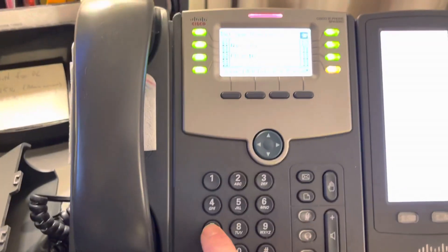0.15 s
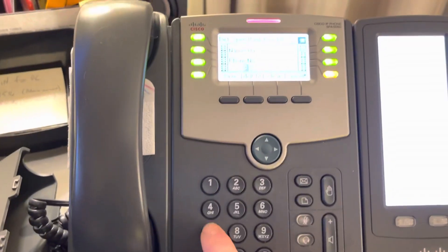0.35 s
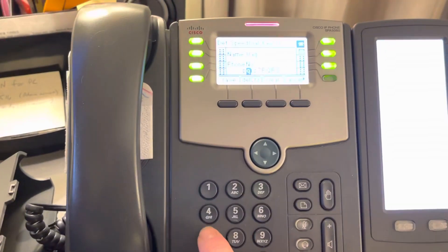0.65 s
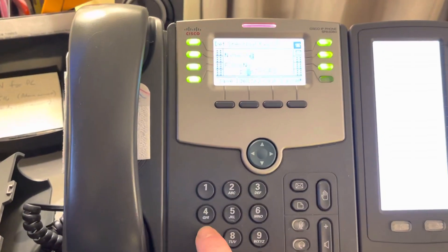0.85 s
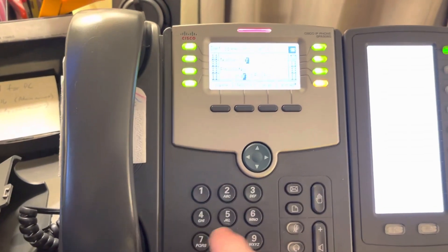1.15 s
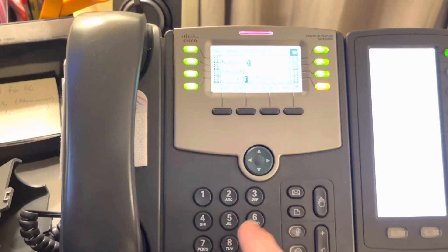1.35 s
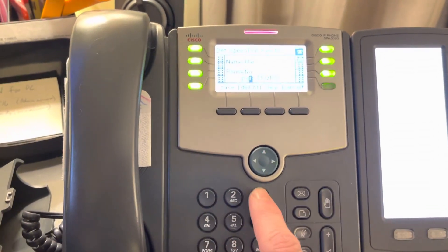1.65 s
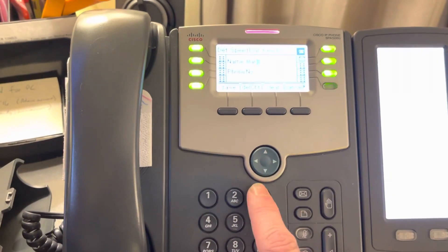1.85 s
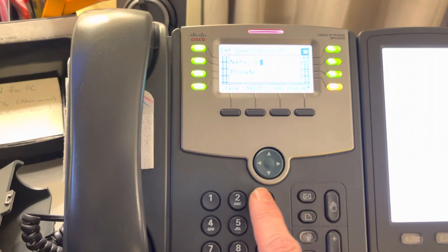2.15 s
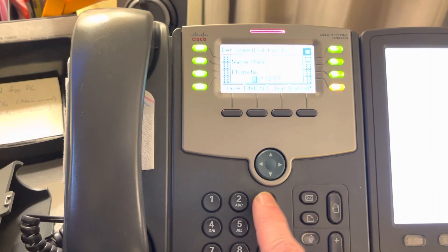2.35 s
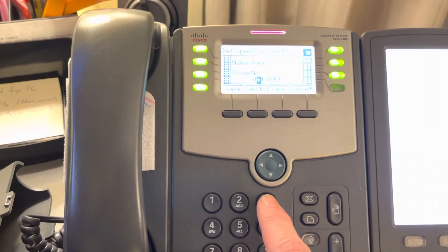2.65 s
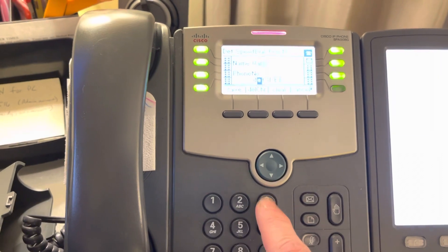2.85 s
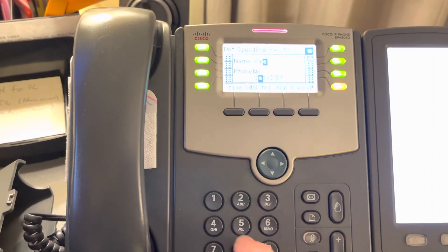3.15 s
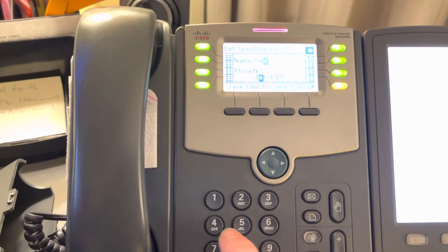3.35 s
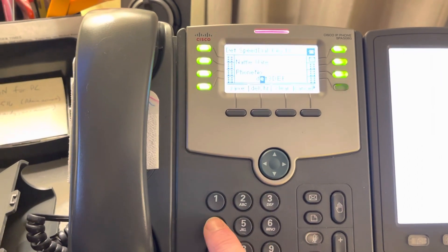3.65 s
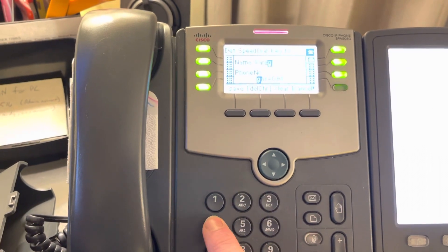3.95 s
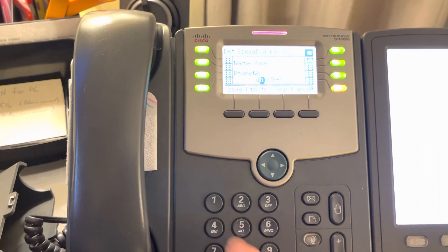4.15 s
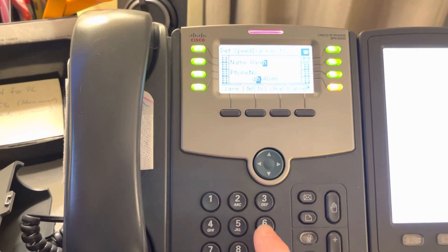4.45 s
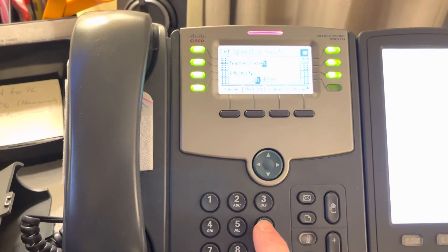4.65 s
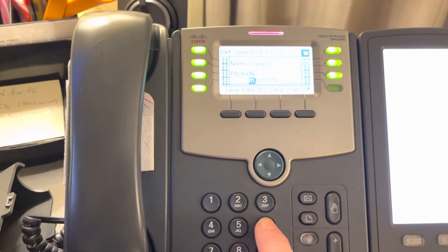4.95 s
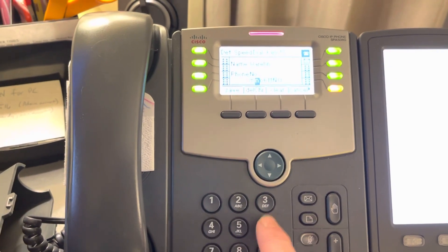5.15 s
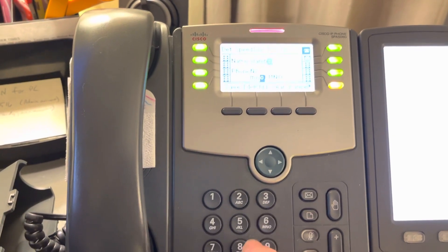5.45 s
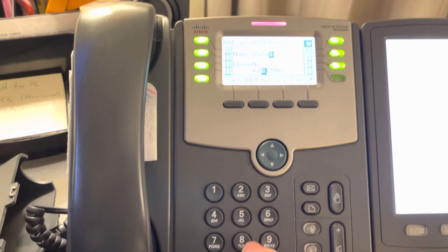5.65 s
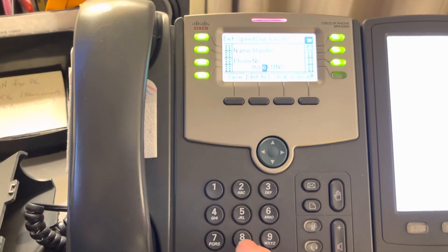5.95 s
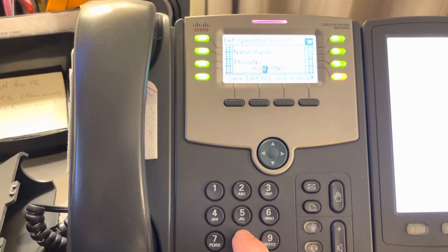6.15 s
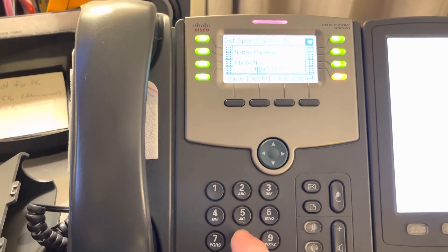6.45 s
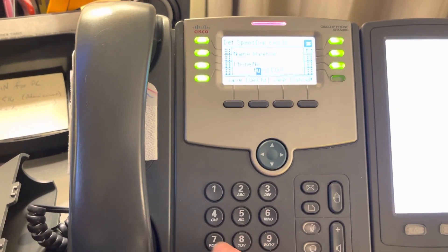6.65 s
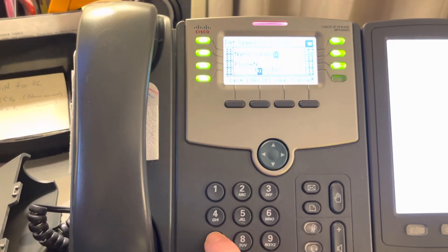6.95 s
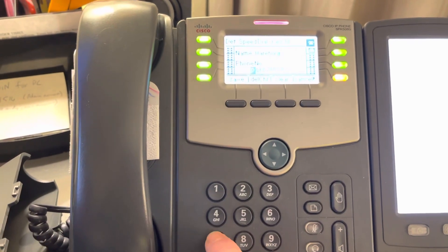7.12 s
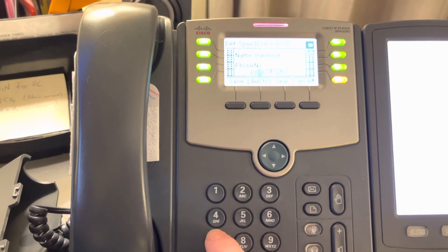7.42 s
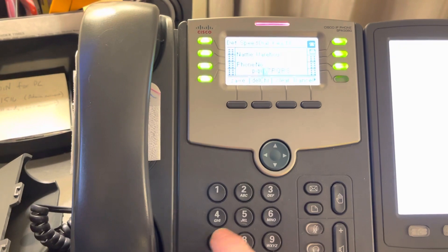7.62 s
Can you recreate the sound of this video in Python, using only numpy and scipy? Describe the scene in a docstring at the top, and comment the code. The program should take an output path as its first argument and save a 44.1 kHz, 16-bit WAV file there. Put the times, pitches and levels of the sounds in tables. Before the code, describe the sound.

Plastic keys on a desk phone click and clack in quick runs under a finger, over a faint low room hum.

```python
"""Desk phone keypad, close up

A finger types in quick runs on plastic keys, just in front of a stereo microphone in a small quiet room.
Each key bottoms out with a dull clack that can rock the housing, then springs back with a bright snap
and a bounce. Every key has its own voice, and a harder blow is brighter. Between runs the finger
brushes over the keys; ventilation and a mains hum fill the room."""
import sys
import numpy as np
from scipy import signal
from scipy.fft import rfft, irfft, next_fast_len
from scipy.io import wavfile
from scipy.ndimage import map_coordinates

SR = 44100
rng = np.random.default_rng(int(sys.argv[2]) if len(sys.argv) > 2 else 0)


def file_out(sig):
    """Save sig as 16-bit WAV at sys.argv[1]."""
    # one column per channel
    cols = np.atleast_2d(sig).T
    # limit, then scale
    lim = np.clip(cols, -1, 1)
    pcm = np.round(lim * 32767).astype(np.int16)
    wavfile.write(sys.argv[1], SR, pcm)


N = 343098
AGE = np.arange(SR // 8) / SR  # seconds since a blow

# Modes of the keypad plate. Each row: frequency in Hz, level in dB, t60 in seconds.
PLATE_MODES = [(1003, 2.5, 0.047), (1210, 2.5, 0.031), (1453, -5, 0.02), (1950, 2, 0.02),
               (2513, 6.5, 0.022), (3200, -26, 0.013), (4000, -16, 0.014), (4950, -9.5, 0.021),
               (5320, -13, 0.0096), (5920, -10, 0.017), (7500, -18.5, .009)]
# The crack of a cap on its guide. Each row: frequency in Hz, level in dB.
SNAP_SPECTRUM = [(200, -42), (700, -17.5), (1000, 3), (1900, 5), (2500, 2.5), (3050, 0.5), (3700, -3),
                 (4300, -2), (5300, -3.5), (7500, -8), (9500, -5.5), (11000, -7), (12400, -22)]
# Each key going down: 3 kHz colour, treble colour, housing knock, cap rattle, all in dB.
KEY_DOWN = {"3": (-11.5, -9, -3, -23), "4": (-3.5, -10, -13, -9), "6": (-5, -10, -8, -15),
            "7": (-4, 1.5, -26, -4), "8": (-1.5, 1.5, -23.5, -9.5)}
# Each key springing back: 1 kHz colour and treble colour, both in dB.
KEY_UP = {"3": (0, 0), "4": (-8.5, -1.5), "6": (0, 2.3), "7": (-10, -0.38), "8": (0.86, 5)}
# The two short rings of each key cap. Each row: frequency in Hz, level in dB against the crack.
CAP_MODES = {"3": [(2500, -5), (10500, -13)], "4": [(3500, -7.5), (4750, -10.5)], "6": [(5400, -11.5),
             (10500, -8.5)], "7": [(3720, -7.5), (5600, -14)], "8": [(2200, -7), (11000, -3.5)]}


def keypad():
    """All that the finger sets off; the fine chatter differs in each direction that it radiates."""
    return presses() + releases() + settles() + touches() + brushes()


def presses():
    """A key slides down and hits bottom: the plate clacks, the push rocks the housing, the cap rattles."""
    # Each row: time in seconds, level in dB, key.
    strikes = [(0.08, -44.5, "7"), (0.3318, -42.5, "7"), (0.618, -40.5, "7"), (1.9576, -39, "3"),
               (2.1925, -39, "3"), (3.6236, -42.5, "4"), (3.8163, -37, "4"), (4.638, -51, "6"),
               (4.895, -37.5, "6"), (5.1007, -36, "6"), (6.049, -48, "8"), (6.2407, -34, "8"),
               (6.83, -39, "7"), (7.0269, -37, "7"), (7.2153, -37.5, "7"), (7.3997, -36.5, "7")]
    ordinary_db, slide_s, rattle_s = -39.5, .014, .0028
    brightens, rattle_grows = 2.06, 0.9  # extra dB for each dB harder
    out = np.zeros(N)
    for s, db, key in strikes:
        mid_db, top_db, knock_db, rattle_db = KEY_DOWN[key]
        force_db = db - ordinary_db
        add(out, s - slide_s, amp(db - 25.5) * travel(slide_s))
        add(out, s + .0003, amp(db) * clack(mid_db, top_db + brightens * force_db))
        add(out, s + .001, amp(db + knock_db + 5.5) * knock())
        rattle = snap(db + rattle_db + rattle_grows * force_db, CAP_MODES[key], KEY_UP[key][0], top_db=2)
        add(out, s + rattle_s, rattle)
    return out


def releases():
    """The finger lifts: the key slides up, snaps on its stop and bounces once; the housing recoils."""
    # Each row: time in seconds, level in dB, bounce delay in seconds, bounce level in dB, key.
    lifts = [(0.2024, -36.5, .0028, -39.5, "7"), (0.4495, -35.5, .0076, -39.5, "7"),
             (0.7636, -39, 0.0084, -42, "7"), (2.0841, -36, .002, -48, "3"),
             (2.3263, -33.5, .0034, -39.5, "3"), (3.724, -39, 0.0037, -41.5, "4"),
             (3.9436, -29.5, 0.0037, -34.5, "4"), (4.8026, -30, 0.0031, -32, "6"),
             (4.9924, -39, 0.0057, -38, "6"), (5.2083, -30, 0.0057, -33.5, "6"),
             (6.1704, -36.5, .0074, -44, "8"), (6.3533, -30.5, 0.0079, -44, "8"),
             (6.9356, -34, 0.0048, -38, "7"), (7.1147, -34, .0056, -35.5, "7"),
             (7.304, -34, .0057, -36.5, "7"), (7.5115, -32, 0.0072, -35, "7")]
    slide_s, recoil_db = .005, -8.5
    out = np.zeros(N)
    for s, db, bounce_s, bounce_db, key in lifts:
        low_db, top_db = KEY_UP[key]
        knock_db = KEY_DOWN[key][2]
        strike = s + .0004
        add(out, s - slide_s, amp(db - 26) * travel(slide_s))
        add(out, strike, snap(db, CAP_MODES[key], low_db, top_db))
        add(out, strike, amp(db + knock_db + recoil_db) * knock())
        # Free of the finger, the bouncing cap has a colour of its own.
        add(out, strike + bounce_s, snap(bounce_db, CAP_MODES[key], low_db=-0.5, top_db=6.5))
    return out


def clack(mid_db, top_db):
    """A dull blow on the keypad plate, and its reflection from the desk."""
    # Each row: frequency in Hz, level in dB.
    spectrum = [(150, -33), (450, -2), (750, -7.5), (950, 2), (1300, -2.5), (1600, -4), (2500, -6),
                (4000, -11), (6000, -23), (9000, -24.5), (11000, -20.5), (12400, -36)]
    tilt = [(1400, 0.0033), (3200, mid_db), (7000, top_db)]
    hit = coloured(contact(push_db=-1.5, t60=0.0092, rise_s=0.00024), spectrum, tilt)
    hit = blow(blow(hit) + amp(-6.0) * ring(PLATE_MODES, scatter_db=1.5, detune=0.044))
    desk_echo = coloured(hit, [(1500, -0.5), (5000, -5.5)], [(300, -6.5), (900, 0)])
    delay_s = .0024 * rng.uniform(0.903, 1.42)
    add(hit, delay_s, amp(-7) * desk_echo)
    return hit


def snap(db, cap_modes, low_db, top_db):
    """A light key cap strikes its guide: a bright crack, the cap's short rings, a little of the plate."""
    ordinary_db, brightens = -35.5, 0.59  # an ordinary snap; dB of treble for each dB harder
    tilt = [(1400, low_db), (3200, 0), (7000, top_db + brightens * (db - ordinary_db))]
    crack = coloured(contact(push_db=-10.5, t60=0.012, rise_s=.0001), SNAP_SPECTRUM, tilt)
    cap = sum(amp(level) * blow(fade(AGE, 0.0062) * np.sin(2 * np.pi * hz * AGE))
              for hz, level in cap_modes)
    plate = ring(PLATE_MODES, scatter_db=-1.5, detune=0.058)
    return amp(db - 3.0) * (blow(crack) + cap + amp(low_db - 11.5) * plate)


def knock():
    """The heavy housing takes a moment to start swinging and is too small to radiate bass."""
    # The housing on the desk. Each row: frequency in Hz, level in dB, t60 in seconds.
    housing_modes = [(377, -2.5, 0.04), (466, -5.5, 0.033), (557, -8, 0.038), (638, -5, 0.036),
                     (1040, -18, 0.047), (1140, -15.5, 0.034)]
    swing = ring(housing_modes, scatter_db=-0.3, detune=0.0054) * (1 - np.exp(-AGE / 0.00062))
    return blow(coloured(swing, [(220, -24.0), (350, 8.0)], [(1000, 6.5), (4000, -11.0)]))


def contact(push_db, t60, rise_s):
    """One sharp push and the dense, quickly dying chatter of plastic parts."""
    chatter = rng.standard_normal(len(AGE)) * fade(AGE, t60) * (1 - np.exp(-AGE / rise_s))
    return amp(push_db) * blow(1.0 * (AGE == 0)) + blow(chatter)


def ring(modes, scatter_db, detune):
    """Damped modes; sign, strength and pitch vary with the spot that is struck."""
    hz, db, t60 = np.transpose(modes)[:, :, None]
    size, shift, sign = rng.standard_normal((3, len(modes), 1))
    swing = np.sign(sign) * np.sin(2 * np.pi * hz * (1 + detune * shift) * AGE)
    return blow(np.sum(amp(db + scatter_db * size) * fade(AGE, t60) * swing, 0))


def travel(seconds):
    """A key cap scrapes along its guide, in tiny slips that grow until it strikes."""
    n = int(seconds * SR)
    slips = np.repeat(rng.standard_normal(n // 64 + 1), 64)[:n]
    scrape = rng.standard_normal(n) * amp(1.8 * slips + np.linspace(-7, 0, n))
    return unit(coloured(scrape, SNAP_SPECTRUM, [(1400, 5.0), (7000, -4.0)]))


def settles():
    """The housing drops back on its stand with a hollow knock that also shakes the plate."""
    # Each row: time in seconds, level in dB.
    drops = [(0.6301, -51), (.638, -44), (4.923, -55), (5.12, -32), (5.176, -44)]
    out = np.zeros(N)
    for s, db in drops:
        add(out, s, amp(db) * (knock() + amp(-8.5) * clack(mid_db=-9, top_db=-18)))
    return out


def touches():
    """Faint ticks as the fingertip lands or shifts on a loose key cap."""
    # Each row: time in seconds, level in dB.
    nudges = [(0.6138, -46), (1.67, -56.5), (1.749, -61), (2.134, -55), (3.5627, -54.5), (4.672, -54.5),
              (4.884, -51), (4.988, -49), (5.0946, -50), (6.029, -54.5), (6.2353, -40.5), (6.3185, -55)]
    # A cap damped by the fingertip. Its one row: frequency in Hz, level in dB.
    damped_cap = [(2330, -8.5)]
    out = np.zeros(N)
    for s, db in nudges:
        add(out, s, snap(db, damped_cap, low_db=3, top_db=1.5))
    return out


def brushes():
    """Skin on plastic: a grainy hiss that swells and fades with each stroke, over the hand's low drag."""
    # Each row: start and end in seconds, level in dB.
    strokes = [(1.346, 1.391, -68.5), (1.445, 1.633, -60), (1.668, 1.747, -63.5), (2.028, 2.096, -67),
               (2.27, 2.321, -74), (4.63, 4.72, -77), (6.033, 6.047, -70)]
    # Each row: frequency in Hz, level in dB.
    skin_spectrum = [(200, -2), (600, 10), (1200, 7), (2200, -5), (4500, -4.5), (8000, -1.5), (12000, -4)]
    drag_spectrum = [(25, -19), (55, 3.0), (110, -13), (400, -48.5)]
    swell = np.zeros(N)
    for start, end, db in strokes:
        add(swell, start, amp(db) * signal.windows.tukey(int((end - start) * SR), .5))
    friction = rng.standard_normal(N) * amp(2.0 * wobble(300))
    hiss = unit(filtered(friction, lambda hz: amp(along(skin_spectrum, hz))))
    drag = unit(filtered(rng.standard_normal(N), lambda hz: amp(along(drag_spectrum, hz))))
    return swell * (hiss + amp(8.5) * drag)


def room(x, stretches=26):
    """The small room answers; each stretch of typing gets a tail of its own."""
    # Each row: frequency in Hz, t60 in seconds.
    decay_times = [(200, 0.26), (1000, 0.27), (3000, 0.16), (7000, 0.17), (12000, 0.16)]
    out = np.zeros((2, N))
    for index in np.array_split(np.arange(N), stretches):
        hz, t, bands = signal.stft(diffuse(SR // 3), SR, nperseg=256)
        tail = signal.istft(bands * fade(t, along(decay_times, hz)[:, None]), SR, nperseg=256)[1]
        tail *= 1 - np.exp(-np.arange(tail.shape[1]) / SR / 0.001)  # reflections build up
        tail /= np.linalg.norm(tail[0])
        add(out, index[0] / SR, signal.fftconvolve(x[None, index], tail, axes=1))
    return out


def ventilation():
    """Low rushing air under a slightly unsteady hum, a little to the right."""
    # The air, then the mains and fan tones. Each row: frequency in Hz, level in dB.
    air_spectrum = [(20, -19.5), (35, -20.5), (50, -4), (62, 2.5), (75, -3.5), (100, -10.5), (125, -7.5),
                    (170, -14), (220, -11), (350, -20), (450, -22.5), (720, -25), (1100, -35), (2700, -45),
                    (4000, -58.5), (9000, -61), (12000, -61.5)]
    hum_tones = [(59.3, -53), (220.7, -66.5), (741.5, -76)]
    air = unit(filtered(diffuse(N), lambda hz: amp(along(air_spectrum, hz))))
    t = np.arange(N) / SR
    hum = np.zeros(N)
    for hz, db in hum_tones:
        peak = amp(db + 1.2 * wobble(2.91)) * np.sqrt(2)
        hum += peak * np.sin(2 * np.pi * hz * t + 0.68 * wobble(1.987))
    return (amp(-48.0 + 0.65 * wobble(3.934)) * air + hum) * amp([[-.5], [.5]])


def diffuse(n):
    """White noise from all around, as the microphone pair hears it."""
    # Each row: frequency in Hz, left-right correlation.
    likeness = [(60, 1), (125, 0.96), (250, 0.81), (500, 0.34), (1200, 0.059), (3000, 0.68), (8000, 0.71),
                (10000, 0.98)]
    turn = lambda hz: np.arccos(np.clip(along(likeness, hz), -1, 1)) / 2
    shares = lambda hz: np.array([np.cos(turn(hz)), np.sin(turn(hz))])
    mid, side = filtered(rng.standard_normal((2, n)), shares)
    return np.array([mid + side, mid - side])


def amp(db):
    """Decibels to gain."""
    return 10 ** (np.asarray(db) / 20)


def unit(x):
    """Scaled to rms 1."""
    return x / np.sqrt(np.mean(x ** 2) + 1e-20)


def blow(x):
    """Scaled so that its energy equals 3 ms at rms 1."""
    return x / np.sqrt(np.sum(x ** 2) / (.003 * SR))


def along(points, hz):
    """(Hz, value) points read on a log axis."""
    f, v = np.transpose(points)
    return np.interp(np.log(hz + 1), np.log(f), v)


def fade(t, t60):
    """Exponential decay, 60 dB in t60."""
    return np.exp(-np.log(1000) * t / t60)


def add(track, s, sound):
    """Mix a sound into a track at s seconds."""
    part = track[..., round(s * SR):][..., :sound.shape[-1]]
    part += sound[..., :part.shape[-1]]


def wobble(rate):
    """A smooth random curve, rate knots a second."""
    return map_coordinates(rng.standard_normal(int(N * rate / SR) + 4), [np.arange(N) * rate / SR])


def filtered(x, response):
    """x through a filter whose gain is a function of Hz."""
    n = x.shape[-1]
    m = next_fast_len(n + SR // 10)
    return irfft(rfft(x, m) * response(np.fft.rfftfreq(m, 1 / SR)), m)[..., :n]


def coloured(x, spectrum, tilt, size=8192):
    """A blow through a causal filter: a spectrum plus the blow's own tilt, both (Hz, dB) points."""
    hz = np.fft.rfftfreq(size, 1 / SR)
    cepstrum = irfft(np.log(amp(along(spectrum, hz) + along(tilt, hz))))
    cepstrum[1:size // 2] *= 2  # folded for minimum phase
    cepstrum[size // 2 + 1:] = 0
    return irfft(rfft(x, size) * np.exp(rfft(cepstrum)))[:len(x)]


def scene():
    """The keypad close in front, a little left; what it throws sideways comes back from the room."""
    # Each row: frequency in Hz, left over right in dB.
    balance = [(400, 0), (900, 3.5), (1350, 8), (1850, 0.5), (2900, 3.5), (5000, 4), (7000, 3.5),
               (9000, 0.5)]
    direct = filtered(keypad(), lambda hz: amp(np.outer([.5, -.5], along(balance, hz))))
    reflections = room(keypad()) + room(keypad())
    return direct + amp(-14.0) * reflections + ventilation()


def record(dry):
    """Two microphone ports resonate in the treble, slightly out of step; the top is cut off steeply."""
    # Each row: frequency in Hz, gain in dB.
    port_gain = [(8800, 0), (9700, 3), (10700, 3), (11300, -0.5), (11800, -10), (12600, -14)]
    # Each row: frequency in Hz, lead of the left port in radians.
    port_phase = [(300, 0), (1800, 0), (2700, .7), (5000, .6), (6700, 0), (7800, .6), (8600, 0),
                  (9600, -2.3), (10300, -3.2), (11000, -4.6), (11800, -6.3)]
    top_hz = 12700
    skew = lambda hz: np.exp(1j * np.outer([.5, -.5], along(port_phase, hz)))
    return filtered(dry, lambda hz: amp(along(port_gain, hz)) * skew(hz) / (1 + (hz / top_hz) ** 80))


dry = scene()
out = record(dry)
file_out(out)
```